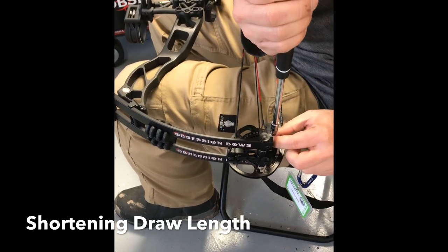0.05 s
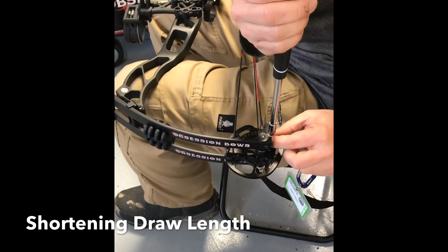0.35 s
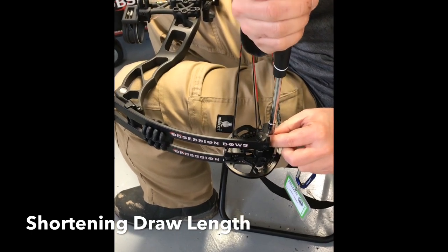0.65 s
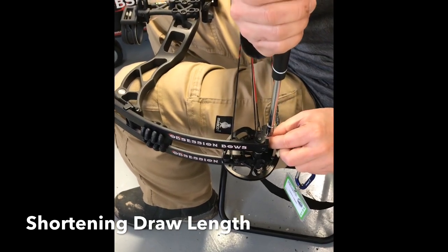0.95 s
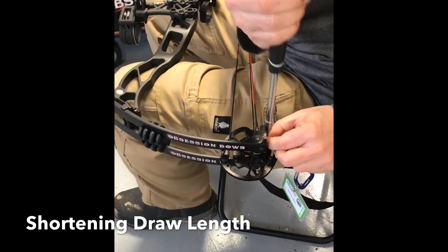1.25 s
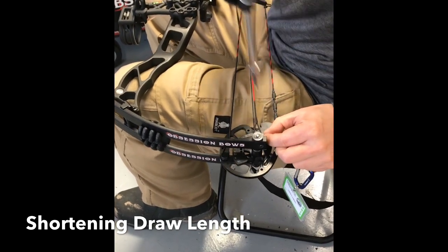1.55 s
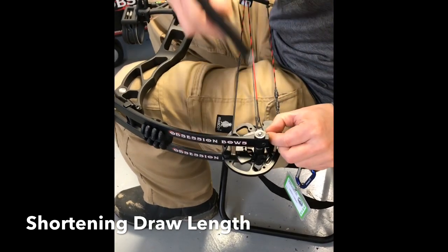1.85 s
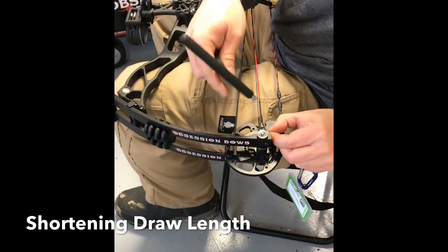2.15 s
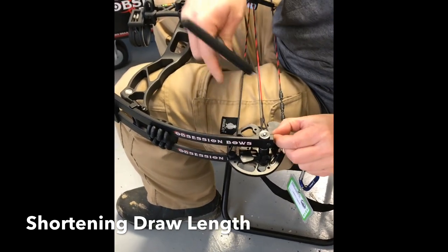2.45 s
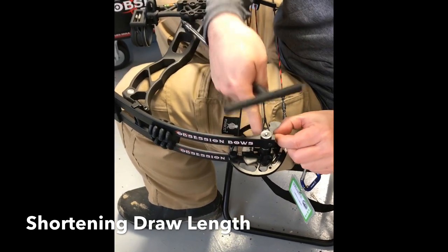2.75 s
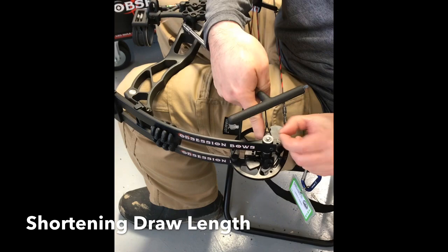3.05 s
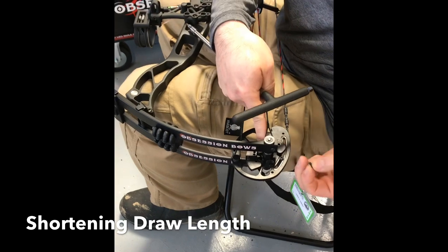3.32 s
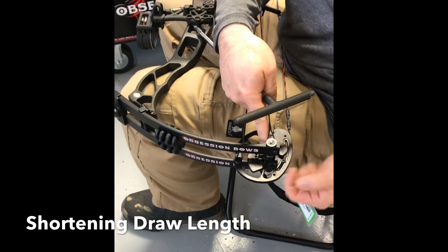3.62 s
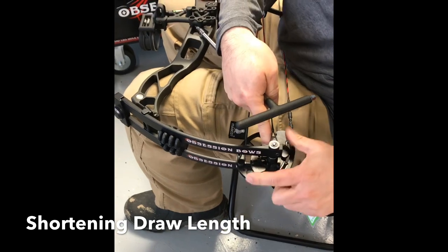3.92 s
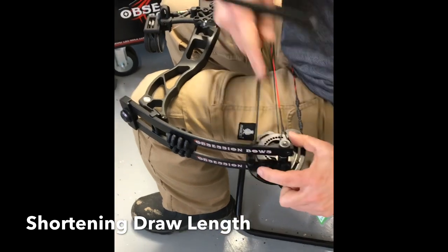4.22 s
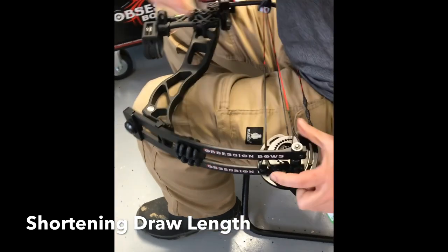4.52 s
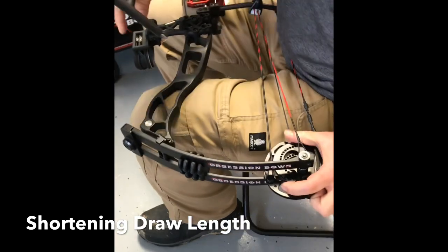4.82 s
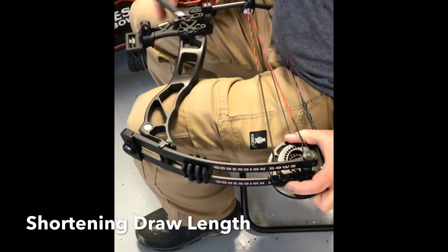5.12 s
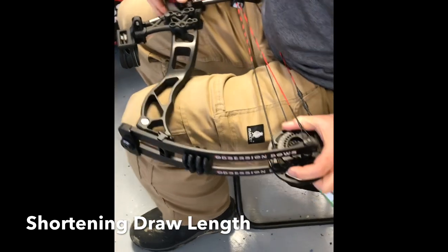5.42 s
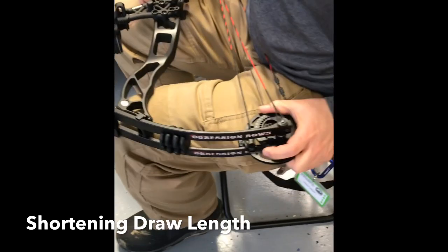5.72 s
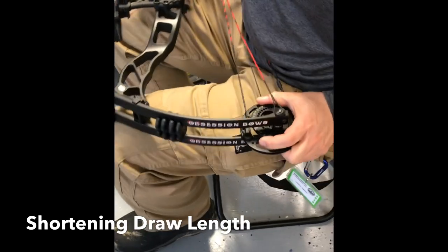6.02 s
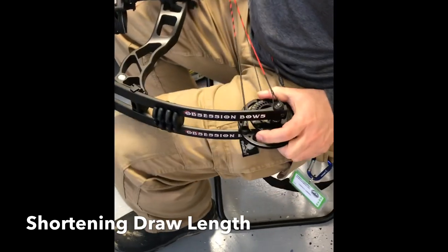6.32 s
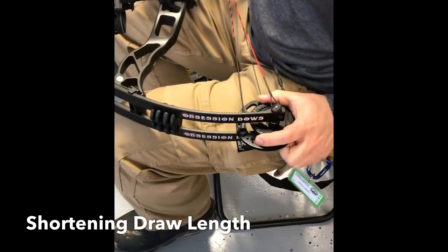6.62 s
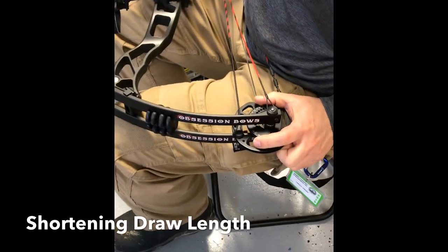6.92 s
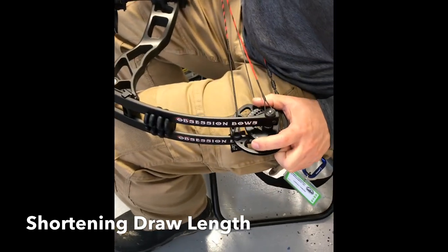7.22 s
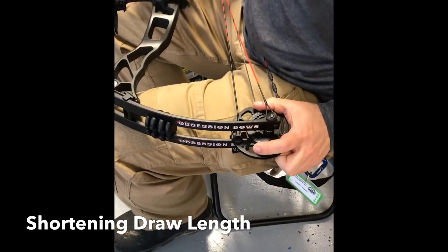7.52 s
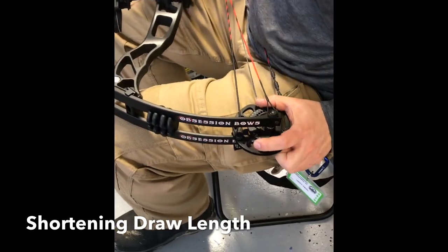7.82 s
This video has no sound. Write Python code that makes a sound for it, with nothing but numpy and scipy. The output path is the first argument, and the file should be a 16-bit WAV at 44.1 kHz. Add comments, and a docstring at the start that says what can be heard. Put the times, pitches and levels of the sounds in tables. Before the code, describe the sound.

In a quiet workshop, a steel hex driver taps and skids on a compound bow's pulley with sharp little clinks, while the screw faintly rasps and squeaks. A sleeve swishes past and the driver is put down with a rattle. The bow then slides over trousers with clicks and knocks, and its cable softly creaks and ticks. Everything is close to the microphone, over faint air noise.

```python
"""Soft rubbing, then sharp clinks: a steel hex driver turns a small screw on the cam (the pulley) of a
compound bow that lies across a lap in a quiet workshop. Each tap makes the metal ring, and the screw
rasps and squeaks. A sleeve sweeps past and the driver is put down with a rattle. Then the bow slides
over the trousers: its fittings click, and the cable creaks and ticks, sticking and slipping as the cam
is turned. Faint air noise and a low drone lie underneath."""
import sys
import numpy as np
from scipy import signal
from scipy.fft import rfft, irfft, next_fast_len
from scipy.io import wavfile

SR = 44100
rng = np.random.default_rng(int(sys.argv[2]) if len(sys.argv) > 2 else 0)


def pcm_store(signal):
    """Save signal as 16-bit PCM."""
    levels = np.round(np.clip(np.atleast_2d(signal), -1, 1) * 32767)
    wavfile.write(sys.argv[1], SR, levels.astype(np.int16).T)


N = 351036
TIME = np.arange(N) / SR


# taps of the tip: t/s, level/dB, strongest f/Hz, ring length/factor, chatter time/s
TIP_TAPS = [(0.7108, -37, 11900, 1.2, 0.013), (1.2443, -57.5, 9000, 0.45, 0.0011),
            (1.8584, -60.5, 4930, 0.88, 0.00023), (2.0568, -43, 3500, 0.59, 0.00051),
            (2.0588, -29.5, 13900, 0.28, 0), (2.0612, -29, 5250, 1.5, .04), (2.1885, -45, 8000, 0.81, 0),
            (2.2755, -53, 6000, 0.27, 0.0011), (2.641, -41.5, 9000, 0.88, 0.0002),
            (2.6942, -49, 5060, 1.3, 0.00072), (2.6966, -33.5, 8800, 1.19, 0.019),
            (2.7135, -40.5, 6319, 2, 0.0011), (2.7703, -28, 3900, 0.58, 0.017),
            (2.7803, -30.5, 10000, 0.48, 0.00093), (2.7945, -37.5, 3870, 1.7, 0),
            (2.8405, -29.5, 12400, 0.89, 0.00064), (2.842, -40, 3230, .9, 0.0012),
            (3.5122, -52, 10860, 2.3, 0.0035), (3.7611, -53, 2800, 0.36, 0.0016)]
# the tones that cam and tip ring with, and the noisy crack of a tap: f/Hz, level/dB
CAM_TONES = [(1020, -12), (1400, -5), (1660, -4.5), (2400, -21), (2820, 0), (3250, -13), (3590, -4),
             (4060, -16), (4720, -57), (5525, 2.5), (6380, 4), (8330, 0), (9720, 0.5), (12900, 1.5),
             (14300, -38)]
CAM_CRACK = [(150, -4), (700, -3.5), (1200, -0.5), (3000, 8), (6500, -0.5), (10000, -1.5), (16000, -1)]
def tip_clinks():
    """The steel tip strikes and skids on screw and cam, and the metal rings briefly."""
    taps = chatter(TIP_TAPS, drop_db=-3.5, fall_db=-17.5)
    return hits(taps, CAM_TONES, CAM_CRACK, ring_db=-4, ring_s=0.036, crack_s=0.021)


# turns of the screw: start/s, length/s, level/dB, pitch/factor
RASPS = [(0.909, 0.093, -68, 0.9), (1.032, 0.13, -62.5, 0.9), (2.314, 0.14, -65, 0.92),
         (2.424, 0.081, -59.5, 0.88)]
# where the thread resonates: f/Hz, width/Hz, level/dB
THREAD_BANDS = [(2840, 700, 3), (4670, 280, 3.5), (6830, 620, 1.5), (8900, 440, -9), (9800, 430, -3.5),
                (13500, 440, 3)]
def screw_rasps():
    """The thread grinds, and its resonances shape the friction noise."""
    out = np.zeros(N)
    for s, length, db, pitch in RASPS:
        def thread_db(f):
            bands = (amp(level) / (1 + (2 * (f - hz * pitch) / width) ** 2) ** 0.61
                     for hz, width, level in THREAD_BANDS)
            return 20 * np.log10(sum(bands))
        rasp = unit(colour(friction(SR // 4, flutter_db=3, per_s=910), thread_db))[:int(length * SR)]
        add(out, s, amp(db) * rasp * signal.windows.tukey(len(rasp), 0.7))
    return out


# thin squeaks: start/s, length/s, level/dB
SQUEAKS = [(2.21, 0.11, -67), (2.448, .05, -65)]
def screw_squeaks(hz=12560, width_hz=80, stutter_db=4):
    """The spinning screw whistles in short, uneven fits."""
    whistle = noise(N, lambda f: -20 * np.log10(1 + ((f - hz) / width_hz) ** 2))
    stutter = np.interp(TIME, np.linspace(0, N / SR, 400), rng.standard_normal(400))
    fits = np.zeros(N)
    for s, length, db in SQUEAKS:
        add(fits, s, amp(db) * signal.windows.tukey(int(length * SR), 0.5))
    return fits * unit(whistle * amp(stutter_db * stutter))


# the driver lands: t/s, level/dB, strongest f/Hz, ring length/factor, chatter time/s
DRIVER_TAPS = [(4.224, -55, 2800, 0.45, 0.00019), (4.33, -44.5, 3000, .7, 0), (4.3615, -54, 3200, 0.44, 0),
               (4.4018, -30, 3280, 0.38, 0.00028), (4.4072, -34, 6960, 1, .008),
               (4.4198, -27, 4220, 0.44, .022)]
# its ringing tones and its crack: f/Hz, level/dB
DRIVER_TONES = [(2830, -5), (3200, 0.5), (3330, -3.5), (3560, -15), (5930, -6), (6450, -5), (7200, -5),
                (8470, 0), (11050, -1.5)]
DRIVER_CRACK = [(150, -11), (800, -13), (1200, 0), (3200, -4), (5000, -7), (8000, -6), (10000, -9.5),
                (16000, 0.5)]
def driver_rattle():
    """The driver is put down and bounces to rest."""
    taps = chatter(DRIVER_TAPS, drop_db=-5.5, fall_db=-10.5)
    return hits(taps, DRIVER_TONES, DRIVER_CRACK, ring_db=2, ring_s=0.026, crack_s=0.026)


# clicks of the fittings: t/s, level/dB
FITTING_CLICKS = [(4.156, -37.5), (4.163, -44), (4.2643, -43.5), (4.2852, -38), (4.3155, -35),
                  (4.4499, -32.5), (4.6914, -42), (4.7118, -30.5), (4.899, -56), (5.057, -54),
                  (5.1213, -55.5), (5.395, -54), (5.4795, -54)]
# their ringing tones and their crack: f/Hz, level/dB
FITTING_TONES = [(1100, -1), (1459, -4), (2060, 5.5), (2700, 2), (4620, 1.5), (5100, -5), (5609, -4),
                 (6030, -1.5), (7950, -3), (8450, 4), (9300, 4.5), (9749, -1), (11350, 2), (12410, -15)]
FITTING_CRACK = [(150, -5), (700, -4), (1200, 10.5), (3500, 3.5), (5000, 0.5), (9000, -4), (12000, 2.5),
                 (16000, -4)]
def fitting_clicks(centre_hz=7700):
    """Loose parts knock and ring as the bow is moved."""
    taps = [(s, db, centre_hz) for s, db in FITTING_CLICKS]
    return hits(taps, FITTING_TONES, FITTING_CRACK, ring_db=6.5, ring_s=0.033, crack_s=0.078)


# ticks in the cam's groove: t/s, level/dB
GROOVE_TICKS = [(7.0631, -49), (7.1838, -44), (7.2621, -47), (7.4022, -38)]
# their ringing tones and their crack: f/Hz, level/dB
GROOVE_TONES = [(1250, -3.5), (2159, -1.5), (2750, 0), (3960, -14), (4380, -20.5), (4915, -28), (5500, -6),
                (5970, 1), (6950, -5), (8258, -15), (10730, -22)]
GROOVE_CRACK = [(200, -11), (1200, -11), (3000, 2), (4300, 11), (6000, -3.5), (7600, -8), (11000, 2),
                (16000, -12)]
def groove_ticks():
    """The cable ticks as it settles into the groove of the cam."""
    return hits(GROOVE_TICKS, GROOVE_TONES, GROOVE_CRACK, ring_db=-1, ring_s=0.03, crack_s=0.027)


# single slips of the cable: t/s, level/dB
SLIPS = [(6.0688, -48.5), (6.226, -53.5), (6.4196, -47), (6.4435, -53), (6.614, -52.5), (6.6405, -51.5),
         (6.6525, -50), (6.683, -50), (7.76, -50.5), (7.775, -48), (7.786, -53.5), (7.8279, -49.5)]
# runs of slips: start/s, length/s, level/dB, change over the run/dB
CREAKS = [(6.072, 0.15, -51.5, -6.5), (6.438, .165, -58, 4)]
# the ringing tones and the crack of a slip: f/Hz, level/dB
CABLE_TONES = [(1150, 2.5), (1850, 2.5), (3150, -3), (4570, -7), (4950, -4.5), (5400, -4), (8480, -6.5),
               (8730, 5), (9170, -0.5), (9400, 2), (12500, -10)]
CABLE_CRACK = [(300, -10), (1500, 13.5), (5000, 1.5), (7600, -3.5), (9000, -6), (10500, -5.5), (16000, 3.5)]
def cable_slips(slow_per_s=125, fast_per_s=400, jitter=0.17):
    """The tight cable sticks and slips: one jerk is a tick, a run of them is a creak."""
    out = hits(SLIPS, CABLE_TONES, CABLE_CRACK, ring_db=-3.5, ring_s=0.059, crack_s=0.038)
    for s, length, db, change_db in CREAKS:
        delays = rng.standard_normal(120)
        jerks = [ring(CABLE_TONES, CABLE_CRACK, ring_db=-6, ring_s=0.04, crack_s=0.018, detune=0.012)
                 for _ in range(6)]
        progress = 0
        for k, late in enumerate(delays):
            if progress > 1:
                break
            # the jerks come fastest in the middle of the run
            per_s = slow_per_s + (fast_per_s - slow_per_s) * np.sin(np.pi * progress) ** 2
            jerk = jerks[k % len(jerks)]
            gain = amp(db + change_db * progress) * np.sqrt(SR / per_s)
            add(out, s + progress * length, gain * jerk / np.linalg.norm(jerk))
            progress += np.exp(jitter * late) / per_s / length
    return out


# the tone colour of the sleeve: f/Hz, level/dB
SLEEVE_COLOUR = [(60, -19), (130, -13), (200, -0.5), (300, 0.5), (430, -8), (650, -3.5), (820, -12.5),
                 (1050, 0), (1250, -4.5), (2100, -11), (5400, -12.5), (7500, -14.5), (12800, -17),
                 (16000, -19)]
def sleeve_sweep(level_db=-36, fizz_lag_s=0.0093):
    """Coarse cloth sweeps over the bow and catches on edges; the weave's fizz follows its speed."""
    snag = rng.standard_normal(SR // 400) * np.linspace(1, 0, SR // 400)
    scrape = np.convolve(crackle(N, per_s=260), snag, "same")
    rubbing = friction(N, flutter_db=0.5, per_s=600) + amp(-5) * unit(scrape)
    cloth = colour(rubbing, lambda f: read(SLEEVE_COLOUR, f))
    swish = colour(cloth, lambda f: -10 * np.log10(1 + (f / 5500) ** 8))  # the part below 5500 Hz
    zipping = noise(N, lambda f: hump(f, 5200, octaves=0.2))
    fizz = amp(-10) * unit(cloth - swish) + amp(-9) * zipping
    speed = swell(peak_s=4.05, rise_s=0.089, fall_s=0.11, shape=2.6)
    late_speed = np.interp(TIME - fizz_lag_s, TIME, speed)
    return amp(level_db) * (unit(swish) * speed + fizz * late_speed)


# rubs and hisses of handling: peak t/s, rise/s, fall/s, level/dB, f/Hz, width/octaves
RUBS = [(.33, .6, 0.79, -58, 93, .4), (1.38, 0.26, 0.9, -67.5, 1340, 1.3),
        (3.77, 0.076, 0.36, -65, 1410, 1.66), (4.32, 0.036, 0.086, -52, 1518, 1.7),
        (4.475, 0.028, 0.13, -51.5, 750, 0.24), (4.49, .05, 0.23, -53.5, 253, .3),
        (4.548, 0.1, .16, -43.5, 1670, 0.92), (4.75, 0.082, 0.52, -57, 2390, 1.47),
        (5.01, 0.13, 0.18, -57, 1890, 0.84), (5.307, 0.024, 0.18, -48.5, 2320, 0.61),
        (5.305, .02, 0.087, -51.5, 1780, 0.19), (5.315, 0.024, 0.17, -54, 5200, 0.2),
        (5.33, 0.2, 0.31, -64, 850, 0.3), (5.57, 0.25, .19, -54.5, 1760, 1.85),
        (5.59, 0.15, .14, -55.5, 9250, 1.2), (5.85, 0.071, 0.16, -55, 3200, 1.37),
        (6.05, 0.2, 0.5, -58, 1300, 2.7), (7.53, 0.25, 0.21, -69, 600, 0.13),
        (7.745, .015, 0.084, -68, 12100, .37)]
def handling_rubs(hiss_db=-25.5):
    """A low rub of the hand on the driver, then sliding cloth that hisses and crackles as it catches."""
    out = np.zeros(N)
    for s, rise, fall, db, hz, octaves in RUBS:
        catches = amp(-8) * unit(crackle(SR, per_s=150))
        rubbing = friction(SR, flutter_db=1.5, per_s=350) + catches
        rub = colour(rubbing, lambda f: np.maximum(hump(f, hz, octaves), hiss_db + hump(f, hz, 1.9)))
        out += amp(db) * swell(s, rise, fall) * np.resize(unit(rub), N)
    return out


# finger strokes: peak t/s, rise and fall each/s, level/dB, f/Hz
FINGER_STROKES = [(.5, 0.08, -66, 1920), (.58, 0.1, -62, 2490), (2.48, 0.22, -64, 1350),
                  (6.3, 0.21, -62, 1282), (6.53, 0.082, -61, 1400), (7.48, 0.25, -69.5, 1110)]
def finger_rubs():
    """Fingertips rub on grip and cam, each making a narrow band of noise."""
    out = np.zeros(N)
    for s, half, db, hz in FINGER_STROKES:
        rub = colour(friction(SR, flutter_db=1.5, per_s=350), lambda f: hump(f, hz, octaves=0.25))
        out += amp(db) * swell(s, half, half) * np.resize(unit(rub), N)
    return out


# dry knocks: t/s, level/dB, f/Hz, width/octaves
KNOCKS = [(0.71, -42, 1500, 0.23), (.712, -53, 615, 0.31), (2.061, -43.5, 700, 0.89),
          (2.4203, -45, 1350, .25), (2.77, -40, 1140, 0.19), (3.7608, -48.5, 1500, 0.62),
          (5.2977, -39, 2560, 0.49), (5.395, -41.5, 3100, .25), (5.444, -44.5, 1500, 0.84),
          (5.4804, -34, 2970, 0.77), (5.5307, -37, 1170, 1), (5.533, -33, 2800, 0.17),
          (5.579, -46.5, 870, 1.1), (5.707, -51.5, 570, .5), (5.767, -50.5, 930, 0.67),
          (6.001, -50, 600, 1.6)]
# soft thuds: t/s, level/dB, f/Hz
THUDS = [(3.231, -40, 156), (3.27, -52.5, 260), (4.318, -46, 251.7), (4.461, -48, 247), (5.534, -47.5, 215),
         (5.809, -46.5, 233), (5.906, -49, 263), (6.051, -49.5, 333), (6.258, -51.5, 253),
         (7.501, -46.5, 230)]
def frame_bumps(knock_cycles=46.5):
    """The bow's frame knocks against tool and hand, and thuds on the lap."""
    out = np.zeros(N)
    for s, db, hz, octaves in KNOCKS:
        add(out, s, bump(db, hz, octaves, fade_s=knock_cycles / hz))
    for s, db, hz in THUDS:
        add(out, s, bump(db, hz, octaves=0.4, fade_s=0.12))
    return out


# arms and legs move: peak t/s, rise and fall each/s, level/dB
SHIFTS = [(.4, 1, -63), (4.53, 0.13, -52.5), (5.95, 0.38, -56.5), (6.55, 0.27, -60), (7.6, 0.2, -64)]
# the tone colour of their rustle: f/Hz, level/dB
SHUFFLE_COLOUR = [(30, -4.5), (60, -6.5), (100, -3), (140, -2.5), (270, -3.5), (500, -15.5), (1200, -17),
                  (4000, -31), (16000, -45)]
def body_shuffle():
    """The body under the bow is never quite still and makes a low rustle."""
    rustle = colour(friction(N, flutter_db=3.5, per_s=45), lambda f: read(SHUFFLE_COLOUR, f))
    return swells(SHIFTS, rest_db=-67) * unit(rustle)


# the tone colour of the air noise: f/Hz, level/dB
AIR_COLOUR = [(15, -39.5), (25, -20.5), (55, 0), (97, -5.5), (161, -9.5), (212, -18.5), (335, -13),
              (677, -20), (1260, -23.5), (2550, -25), (4740, -30), (5880, -27.5), (6380, -30), (10400, -34),
              (16000, -34)]
# the drone grows and fades: peak t/s, rise and fall each/s, level/dB
DRONE_SWELLS = [(.45, 1.3, -59), (3.1, 1.6, -60), (4.1, 0.52, -64.5), (7.62, 0.16, -59)]
def room_tone(air_db=-64.5, drone_hz=51.9):
    """Steady air noise and a low drone fill the quiet room."""
    air = amp(air_db) * noise(N, lambda f: read(AIR_COLOUR, f))
    drone = noise(N, lambda f: hump(f, drone_hz, octaves=0.18))
    return air + swells(DRONE_SWELLS, rest_db=-72.5) * drone


# how long the room echoes: f/Hz, time to fade by 60 dB/s
ECHO_TIMES = [(200, 0.64), (1000, 0.71), (3500, 0.59), (8000, 0.48), (16000, 0.18)]
def workshop(x, early_db=-11, early_s=0.045, tail_db=-13):
    """Sound bounces quickly off lap and floor, then a faint wash of echoes follows."""
    t = np.arange(SR * 3 // 4) / SR
    early = crackle(len(t), per_s=1500) * (t > 0.003) * amp(-60 * t / early_s)
    hz, s, bands = signal.stft(rng.standard_normal(len(t)), SR, nperseg=256)
    fade = amp(-60 * s / read(ECHO_TIMES, hz)[:, None])
    tail = signal.istft(bands * fade, SR, nperseg=256)[1][:len(t)]
    tail *= 1 - np.exp(-(t / 0.0024) ** 2)
    echo = amp(early_db) * early / np.linalg.norm(early) + amp(tail_db) * tail / np.linalg.norm(tail)
    return x + signal.fftconvolve(x, echo)[:N]


def ring(tones, crack, ring_db, ring_s, crack_s, centre_hz=7000, length=0.91, detune=0.009):
    """One tap: a noisy crack plus clear tones, which the grip shifts a little each time."""
    t = np.arange(SR // 5) / SR
    hz, db = np.transpose(tones)[:, :, None]
    louder, higher = rng.standard_normal((2,) + hz.shape)
    phase = 2 * np.pi * rng.random(hz.shape)
    fade_s = ring_s * length * np.sqrt(5000 / hz)  # high tones die sooner
    waves = np.sin(2 * np.pi * hz * (1 + detune * higher) * t + phase)
    clear = amp(db + 2 * louder - 60 * t / fade_s) * waves
    burst = noise(len(t), lambda f: read(crack, f)) * amp(-60 * t / (crack_s * length))
    sound = burst + amp(ring_db) * clear.sum(0) / np.linalg.norm(amp(db))
    # a hard, glancing tap favours the high tones, a blunt one the low
    sound = colour(sound, lambda f: np.maximum(hump(f, centre_hz, octaves=0.96), -12))
    sound *= 1 - np.exp(-t / 0.00071)
    return sound / np.linalg.norm(sound) * np.sqrt(SR / 200)  # the energy of 5 ms at level 1


def hits(taps, tones, crack, ring_db, ring_s, crack_s):
    """All the taps on one object, each at its own time and level."""
    out = np.zeros(N)
    for s, db, *touch in taps:
        add(out, s, amp(db) * ring(tones, crack, ring_db, ring_s, crack_s, *touch))
    return out


def chatter(rows, drop_db, fall_db, count=6):
    """A skidding tool strikes again and again, ever weaker and with growing gaps."""
    taps = []
    for s, db, hz, length, lasts in rows:
        taps.append((s, db, hz, length))
        steps = (np.arange(count) + 1 + rng.uniform(-0.25, 0.25, count)) / count
        if lasts > 0:
            taps += [(s + lasts * u, db + drop_db + fall_db * u, hz, length) for u in steps ** 1.5]
    return taps


def bump(db, hz, octaves, fade_s):
    """A muffled blow: one band of noise that dies without ringing."""
    t = np.arange(SR // 3) / SR
    fade = amp(-60 * t / fade_s) * (1 - np.exp(-t * hz * 2))
    thud = fade * noise(len(t), lambda f: hump(f, hz, octaves))
    return amp(db) * thud * np.linalg.norm(fade) / np.linalg.norm(thud)


def friction(count, flutter_db, per_s):
    """Rubbing noise: countless tiny catches whose strength flutters."""
    samples = np.arange(count)
    hiss, flutter = rng.standard_normal((2, count))
    return unit(hiss * amp(flutter_db * np.interp(samples * per_s / SR, samples, flutter)))


def crackle(count, per_s):
    """Tiny clicks at random moments."""
    return rng.standard_normal(count) * (rng.random(count) < per_s / SR)


def swell(peak_s, rise_s, fall_s, shape=1.24):
    """Loudness that grows to a peak and fades, 16 dB down at the ends of the rise and fall."""
    away = np.maximum((peak_s - TIME) / rise_s, (TIME - peak_s) / fall_s)
    return amp(-16 * np.minimum(away, 10) ** shape)


def swells(rows, rest_db):
    """Slow, even swells over a resting level."""
    power = sum((amp(db) * swell(s, half, half)) ** 2 for s, half, db in rows)
    return np.sqrt(amp(rest_db) ** 2 + power)


def noise(count, db_at):
    """Filtered hiss at level 1."""
    return unit(colour(rng.standard_normal(count), db_at))


def colour(x, db_at):
    """Filters x by a rule that gives dB for each frequency."""
    size = next_fast_len(len(x) + 1024)
    gain = amp(db_at(np.fft.rfftfreq(size, 1 / SR)))
    return irfft(rfft(x, size) * gain, size)[:len(x)]


def hump(hz, centre, octaves):
    """A hill in dB around one frequency."""
    return -28 * np.log10(1 + (np.log2((hz + 1) / centre) / octaves) ** 2 / 2)


def read(points, hz):
    """Looks up a value between the rows of a frequency table."""
    f, value = np.transpose(points)
    return np.interp(np.log(hz + 1), np.log(f + 1), value)


def add(mix, s, sound):
    """Mixes a sound in at s seconds."""
    part = mix[max(round(s * SR), 0):][:len(sound)]
    part += sound[:len(part)]


def amp(db):
    """Turns decibels into a gain."""
    return 10 ** (np.asarray(db) / 20)


def unit(x):
    """Scales x to an average (RMS) level of 1."""
    return x / np.sqrt(np.mean(x ** 2) + 1e-20)


def scene():
    """Tool, bow and clothes close to one microphone; the driver's rattle gets less echo."""
    tool = tip_clinks() + screw_rasps() + screw_squeaks()
    bow = fitting_clicks() + groove_ticks() + cable_slips() + frame_bumps()
    person = sleeve_sweep() + handling_rubs() + finger_rubs() + body_shuffle()
    rattle = workshop(driver_rattle(), tail_db=-17.5)
    return (workshop(tool + bow + person) + rattle + room_tone())[None]


def record(dry):
    """The microphone loses the deepest bass and the highest treble."""
    bass_cut = signal.butter(6, 39, "highpass", fs=SR, output="sos")
    treble_cut = signal.firwin(401, 15900, window=("kaiser", 8), fs=SR)
    return signal.oaconvolve(signal.sosfilt(bass_cut, dry), treble_cut[None], "same")


dry = scene()
out = record(dry)
pcm_store(out)
```